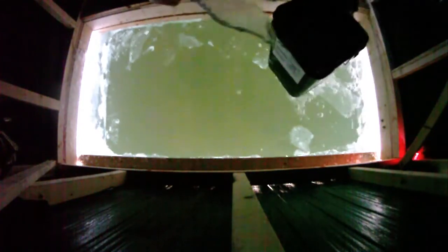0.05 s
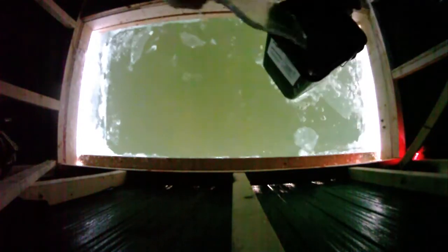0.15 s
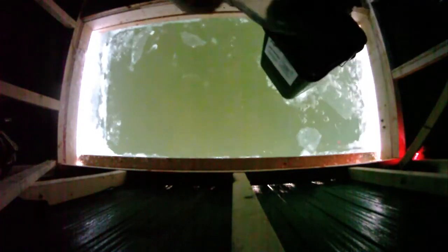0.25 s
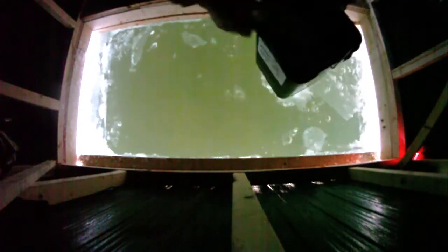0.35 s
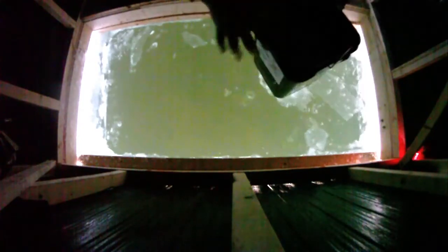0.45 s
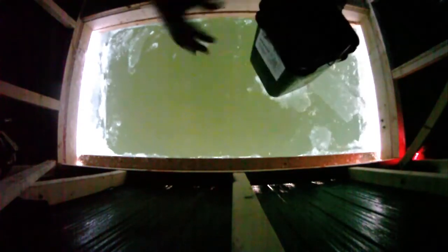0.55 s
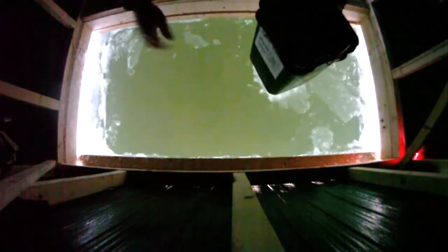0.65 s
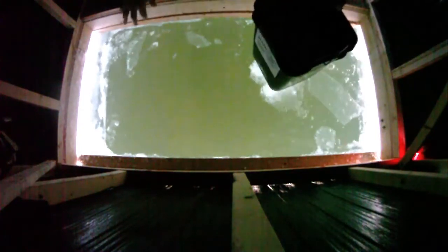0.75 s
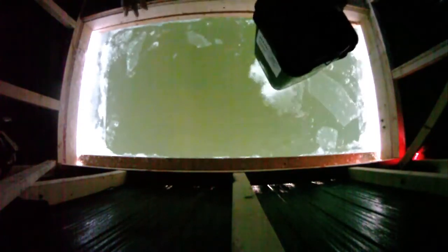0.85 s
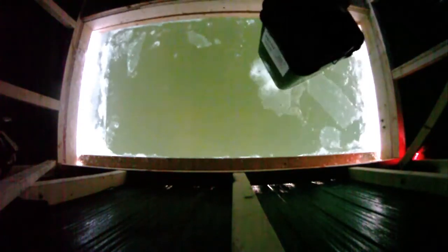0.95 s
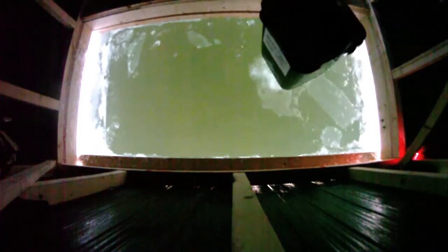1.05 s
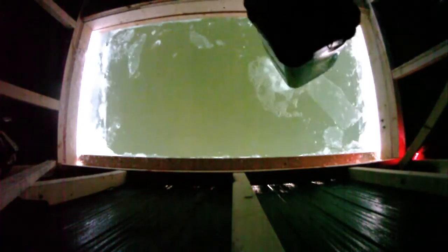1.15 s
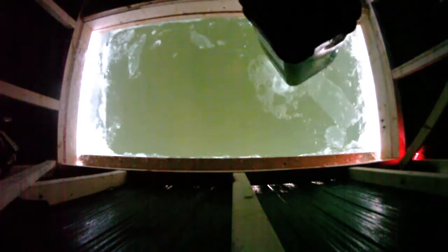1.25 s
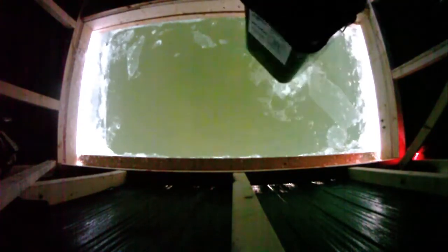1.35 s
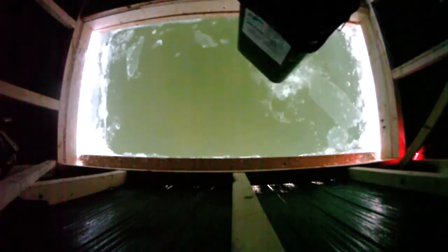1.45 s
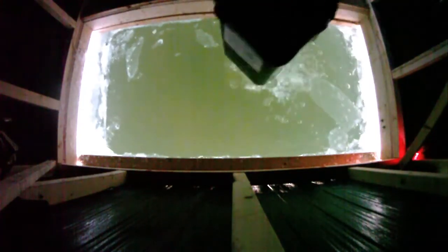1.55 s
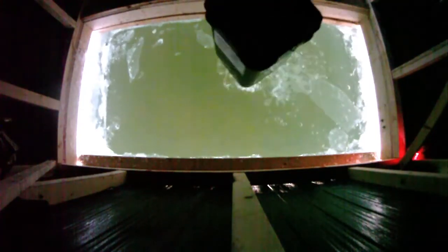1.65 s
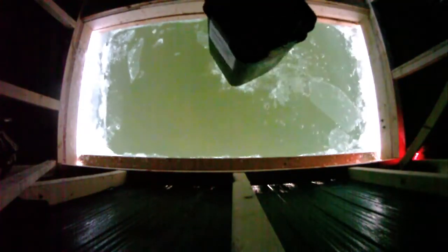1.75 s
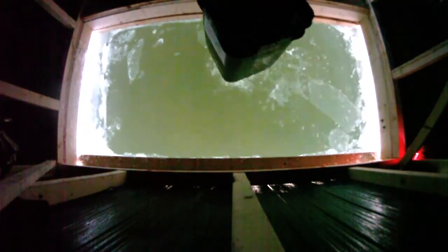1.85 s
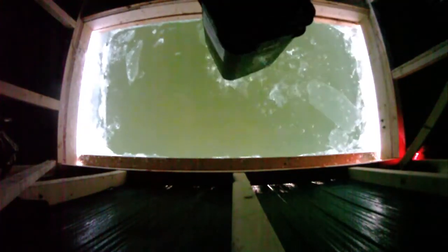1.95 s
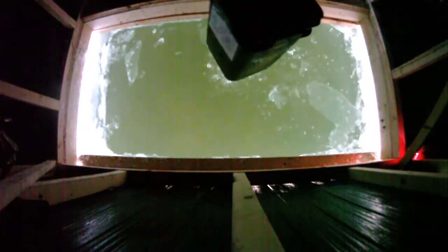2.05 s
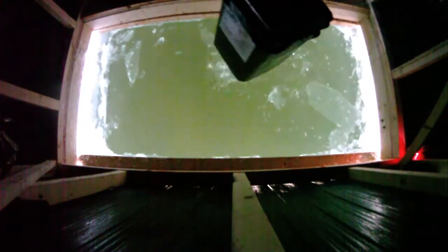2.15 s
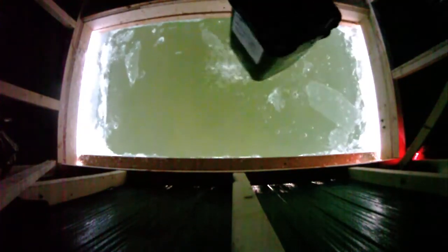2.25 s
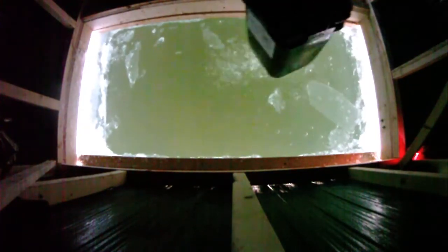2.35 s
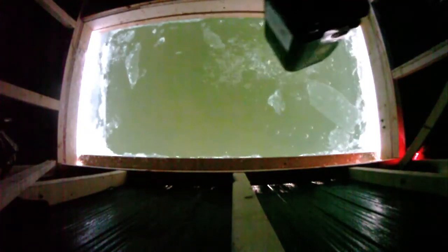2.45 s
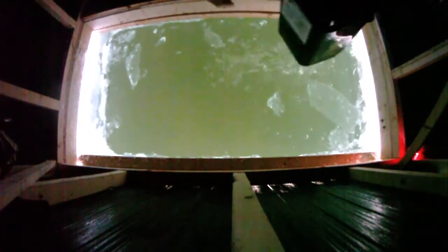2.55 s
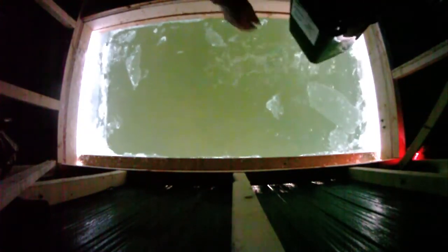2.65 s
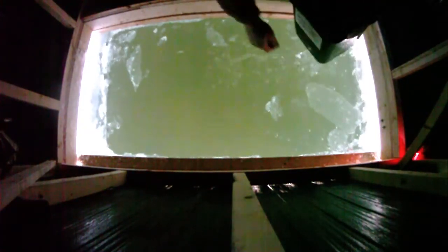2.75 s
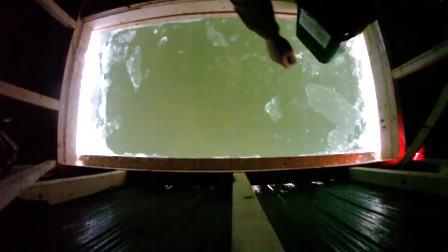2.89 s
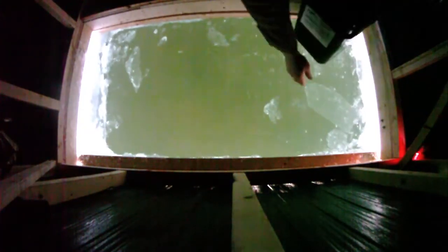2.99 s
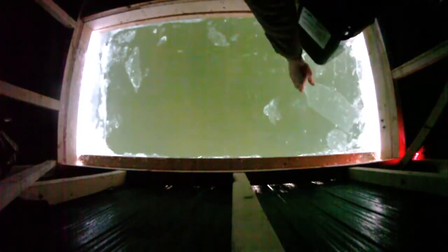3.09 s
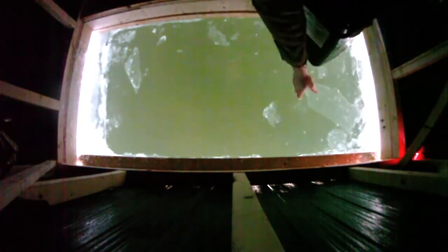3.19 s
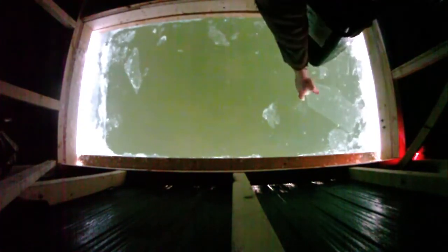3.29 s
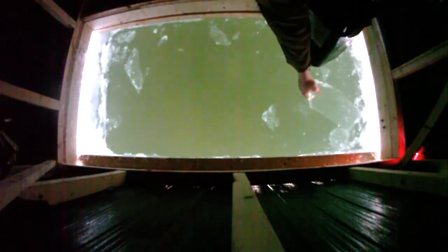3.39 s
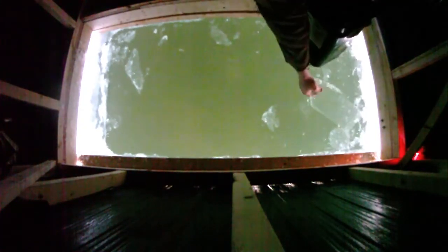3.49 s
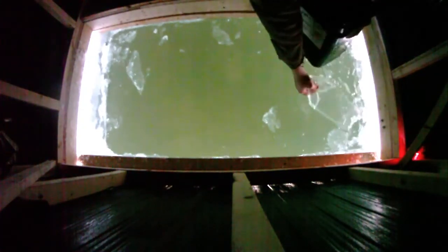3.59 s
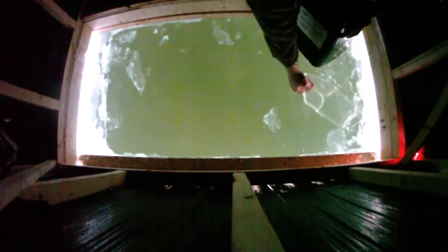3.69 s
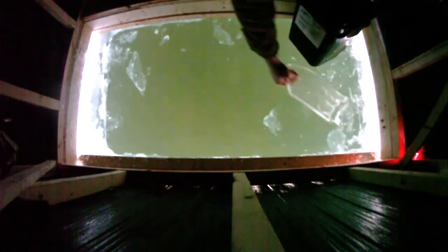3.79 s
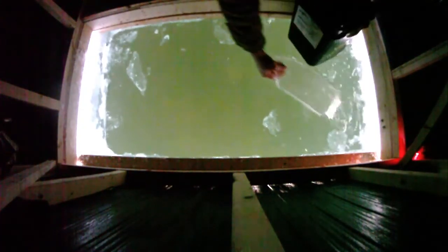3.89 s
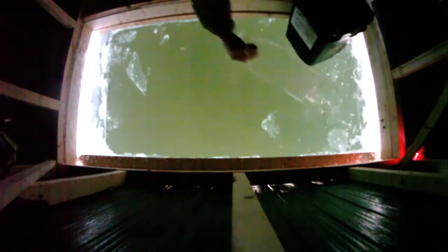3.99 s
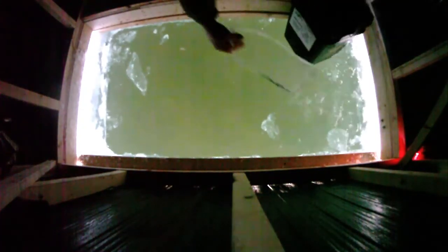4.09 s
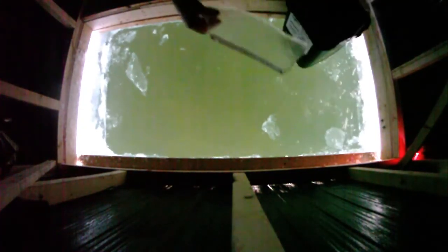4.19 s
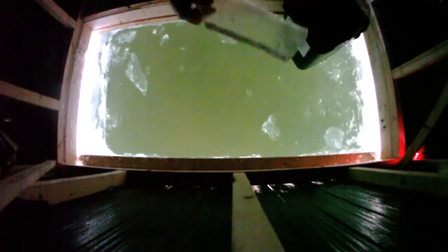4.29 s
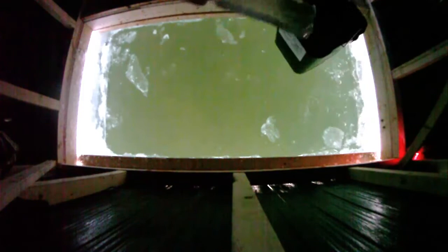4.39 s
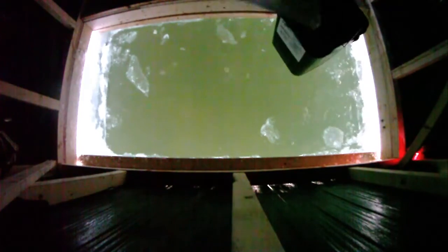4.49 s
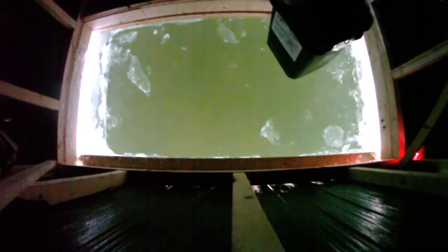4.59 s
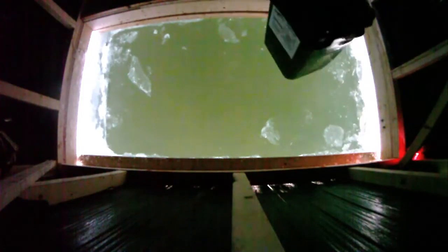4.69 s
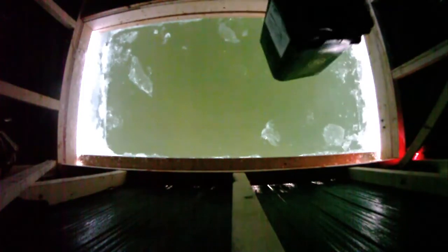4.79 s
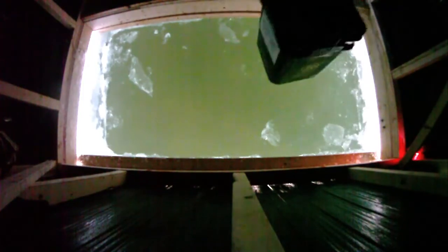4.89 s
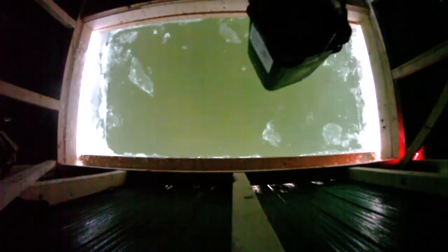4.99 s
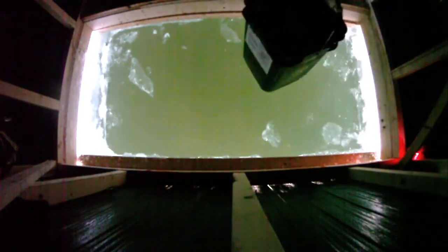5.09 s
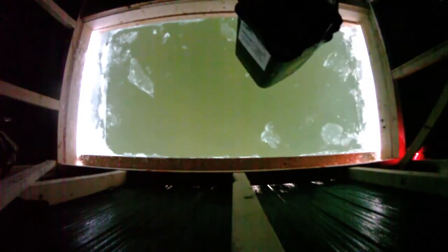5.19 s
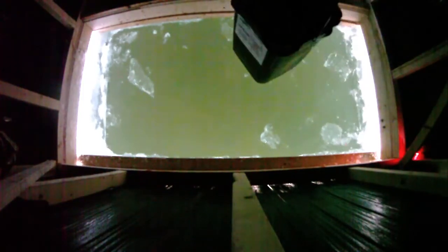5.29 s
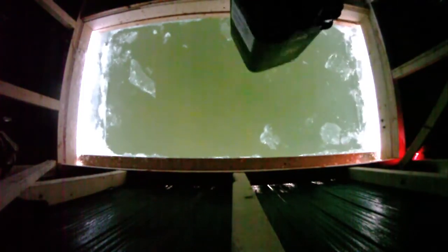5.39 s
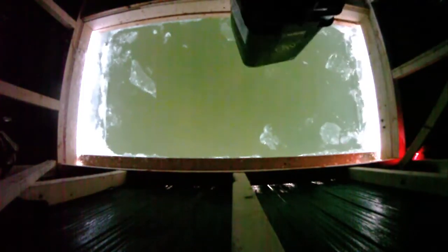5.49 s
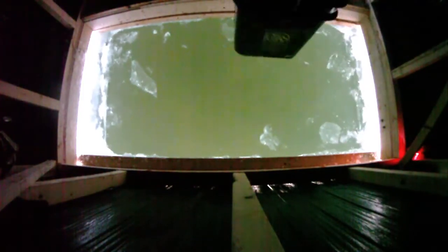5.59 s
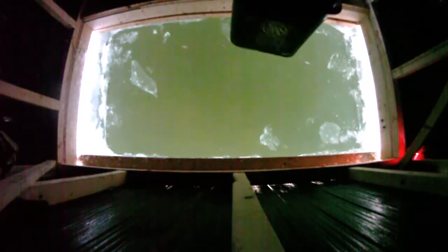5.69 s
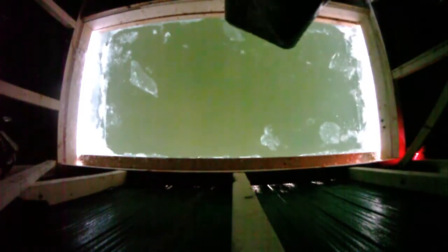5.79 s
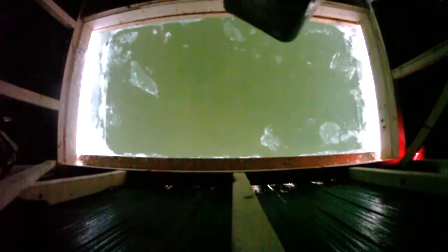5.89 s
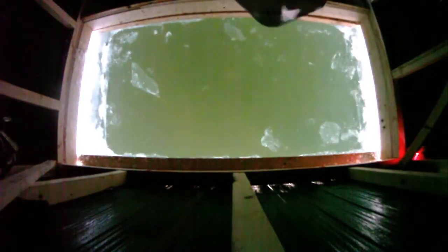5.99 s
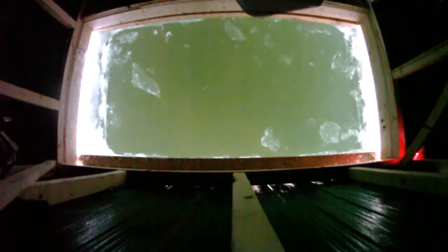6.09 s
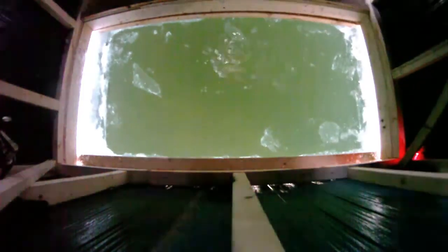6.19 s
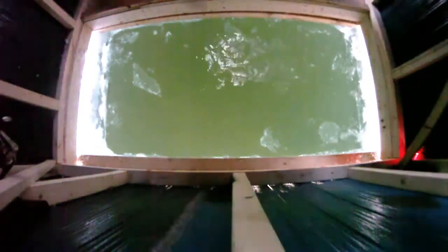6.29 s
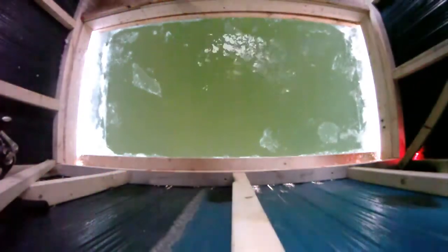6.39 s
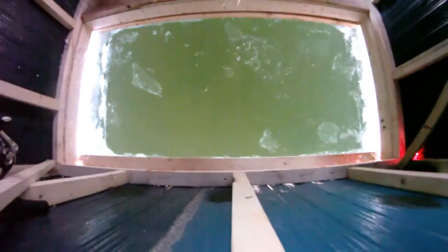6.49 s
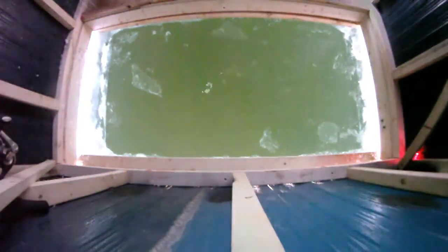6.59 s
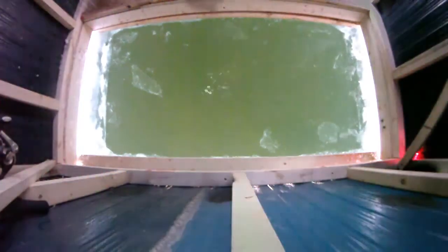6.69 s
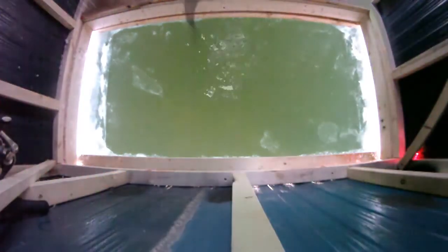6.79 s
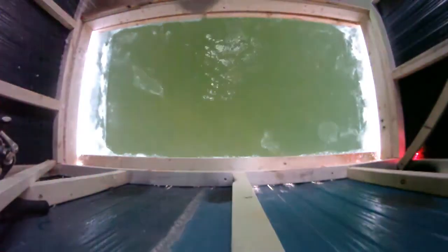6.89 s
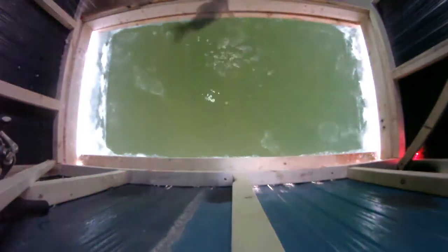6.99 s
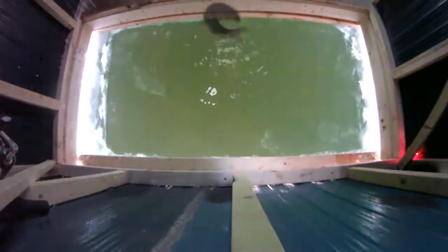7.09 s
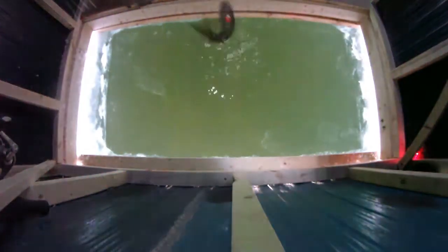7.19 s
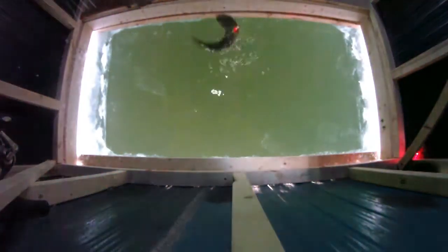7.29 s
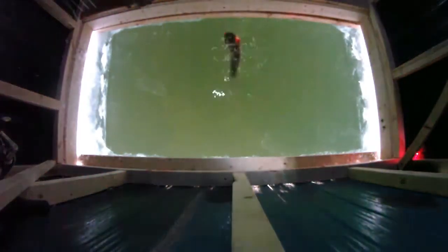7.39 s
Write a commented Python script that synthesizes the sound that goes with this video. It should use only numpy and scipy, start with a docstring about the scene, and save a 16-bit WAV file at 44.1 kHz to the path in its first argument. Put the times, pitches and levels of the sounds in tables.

```python
"""Slabs of ice crash and crumble into a plastic bucket held over a water hole in a small wooden shelter.
Tumbling ice and single blows excite the wall modes of the bucket; cracks are short noise bursts.
Water sloshes and sprays as grainy noise; drips and a few short creaks are damped tones, thuds damped sines.
Low noise buffets the microphone; the shelter answers with a decaying diffuse tail.
Towards the end a bright fluttering hiss sets in, and the sound drops out for a few instants."""
import sys
import numpy as np
from scipy import signal
from scipy.fft import rfft, irfft, next_fast_len
from scipy.io import wavfile
from scipy.ndimage import uniform_filter1d, map_coordinates

SR = 44100
rng = np.random.default_rng(int(sys.argv[2]) if len(sys.argv) > 2 else 0)


def bounce(signal):
    """Save signal as a 16-bit WAV file at the path given by the first command-line argument."""
    frames = np.transpose(np.atleast_2d(signal))
    limited = np.clip(frames, -1, 1)
    pcm = np.round(limited * 32767).astype(np.int16)
    wavfile.write(sys.argv[1], SR, pcm)


def voltage_ratio(level):
    """Linear amplitude factor for a level in decibels (scalar or array-like)."""
    return 10 ** (np.asarray(level, float) / 20)


N = 328545
TIME = np.arange(N) / SR

# nominal wall modes of the bucket, the third being the main one: (frequency [Hz], width [Hz], level [dB])
BUCKET_MODES = [(117, 11.1, -6.5), (193.3, 28.3, -6.5), (246.5, 37, -0.5), (319.3, 49.7, -2),
                (354.4, 26.6, -3), (525, 51, -8.5), (575.7, 22, -7.5), (688, 9.1, -15.5),
                (805, 13.5, -15.5), (1000, 22, -20.5), (1210, 540, -26.5)]
MAIN_MODE = 2
# blows on the bucket: (time [s], relative level [dB], crack over the blow [dB],
# pitch of the main mode [Hz], rattle of the shaken ice over the blow [dB])
BLOWS = [(0.478, -11, -14, 272, -22), (0.579, -8, -5, 270, -12), (0.605, 0.5, -14, 325, -24),
         (0.784, -18, -10, 297, -3), (1.299, -14.5, -12, 260, -12.5), (1.368, -19, -14, 347, -8),
         (1.46, -19, -18, 350, -11), (1.53, -18, -17, 361, -5), (1.618, -19, -19, 225, -8.5),
         (1.868, -31, -5, 280, -21), (2.551, -15.5, -14, 294, -7.5), (2.613, -20, -27, 350, -14),
         (3.159, -20.5, -22, 331, -5), (3.191, -35, -5, 224, -9), (3.238, -14, -15, 244, -11),
         (3.439, -13.5, -16, 258, -10.5), (3.576, -26.5, -8.5, 262, -8.5), (4.585, -29.5, -9, 398, -29),
         (4.846, -7, -13, 289, -26), (4.881, -14, 2, 318, -25), (4.955, -9.5, -18, 361, -18),
         (5.106, -20, -18, 306, -19), (5.525, -29, -4, 370, -5), (5.556, -24.5, -11, 233, -10),
         (5.674, -13, -29, 222, -11.5), (5.696, -21, -12.5, 232, -14), (5.797, -23.5, -24, 217, -15),
         (6.096, -32, -25, 190, -17), (6.484, -20.5, -12, 204, -8.5), (6.747, -26, 9.5, 230, -11),
         (6.803, -16, 3, 207, -5), (6.829, -13, -5.5, 228, -13), (6.882, -14, 3, 233, -27),
         (6.903, -17, 2, 386, -23), (7.146, -3.5, -10.5, 249.6, -8.5), (7.158, -6.5, -4, 241, -9),
         (7.184, -10.5, -4, 257.5, -9)]
# how each sliding load drums the wall: (level over the slush [dB], pitch of the main mode [Hz])
LOAD_DRUMMING = [(0.5, 270), (0.5, 282), (-1.5, 268.5)]
# thuds in the floor: (time [s], level [dB], pitch [Hz], T60 [s], rattle of the shaken ice over the thud [dB])
FLOOR_BLOWS = [(0.58, -13, 135, 0.15, -24), (2.38, -10, 62, 0.13, -47), (5.677, -15.5, 76.6, 0.2, -40),
               (6.161, -9.5, 75.4, 0.22, -22.5), (6.227, -32, 40.4, 0.18, -4),
               (6.257, 1.5, 128.6, 0.19, -23.5)]


def unit(x):
    """Normalisation to an rms of 1."""
    return x / np.sqrt(np.mean(x ** 2) + 1e-20)


def along(points, hz):
    """Interpolation of (frequency [Hz], value) points on a logarithmic frequency axis."""
    f, v = np.transpose(points)
    return np.interp(np.log(hz + 1), np.log(f + 1), v)


def curves(rows):
    """Linear interpolation in time: one value per sample for each column after the time."""
    s, *columns = np.transpose(rows)
    return [np.interp(TIME, s, column) for column in columns]


def wobble(rate):
    """Band-limited random modulation: a smooth curve through rate random knots a second."""
    return map_coordinates(rng.standard_normal(int(N * rate / SR) + 4), [TIME * rate])


def filtered(x, response):
    """Linear filtering: the spectrum of x times a response given as a function of frequency."""
    size = next_fast_len(N + SR // 2)
    return irfft(rfft(x, size) * response(np.fft.rfftfreq(size, 1 / SR)), size)[:N]


def resonant(modes):
    """Modal superposition: causal (frequency [Hz], width [Hz], level [dB]) resonances of alternating sign."""
    def response(f):
        total = 0
        for k, (centre, width, db) in enumerate(modes):
            damping = 1j * f * width
            total = total + (-1) ** k * voltage_ratio(db) * damping / (centre * centre - f * f + damping)
        return total
    return response


def rush(spectrum, patchy_db, grain_db, grain_rate):
    """Turbulent noise of rms 1: random gain patches in time and frequency, roughened into grains."""
    grains = rng.standard_normal(N) * voltage_ratio(grain_db * wobble(grain_rate))
    cells = signal.stft(grains, nperseg=512)[2]
    field = uniform_filter1d(rng.standard_normal(cells.shape), size=6, axis=0)
    field = uniform_filter1d(field, size=8, axis=1)
    noise = signal.istft(cells * voltage_ratio(patchy_db * unit(field)), nperseg=512)[1][:N]
    return unit(filtered(noise, lambda hz: voltage_ratio(along(spectrum, hz))))


def rising_tones(start, db, hz, cycles, rise, longest_s):
    """Damped oscillation with a climbing pitch, as of a bubble that nears the surface."""
    t = np.arange(round(longest_s * SR)) / SR
    age = np.outer(hz / cycles, t)  # in decay constants
    phase = 2 * np.pi * cycles[:, None] * age * (1 + rise * age)
    tones = voltage_ratio(db)[:, None] * np.exp(-age) * np.sin(phase)
    at = np.round(start * SR).astype(int)[:, None] + np.arange(len(t))
    return np.bincount(at.ravel(), tones.ravel(), N + SR)[:N]


def burst(s, db, t60):
    """Exponential decay: power of a wash that swells quickly at s and dies away."""
    out, age = np.zeros(N + SR), TIME[:SR]
    swell = 1 - np.exp(-age / 0.0049)
    out[round(s * SR):][:SR] = (voltage_ratio(db - 60 * age / t60) * swell) ** 2
    return out[:N]


def activity():
    """Addition of incoherent powers: gains of slush, spray, loose ice and each load on the wall."""
    # water running off and lapping between the events:
    # (time [s], slush [dB], spray [dB], loose ice in the bucket [dB])
    trickle = [(0.0, -43, -44, -46.5), (0.46, -47.5, -45.5, -61), (1.0, -43.5, -43.5, -49),
               (1.3, -41.5, -47.5, -64), (1.75, -40.5, -38, -60), (2.05, -40, -43, -56),
               (2.3, -46, -43.5, -77), (2.57, -40.5, -44, -52), (2.78, -48, -44.5, -44),
               (2.92, -73, -46, -53), (3.13, -52, -45, -63), (3.4, -46.5, -51, -46), (3.7, -69, -72, -59.5),
               (4.5, -65.5, -59, -60.5), (5.4, -53.5, -50.5, -46.5), (5.65, -56, -56.5, -71),
               (5.93, -47.5, -58.5, -44), (6.15, -51, -54.5, -51), (6.45, -51.5, -51, -41),
               (6.62, -51, -55, -37.5), (6.85, -26, -38, -26.5), (7.1, -49, -54, -41.5),
               (7.45, -56, -55, -39.5)]
    # loads of ice and water sliding in the bucket, one table each:
    # (time [s], slush [dB], spray over the slush [dB])
    slides = [
        [(0.474, -35, 8), (0.482, -27, -0.5), (0.56, -27.5, -2), (0.585, -15.5, -3.5), (0.62, -19, -3.5),
         (0.66, -18, -3.5), (0.74, -23.5, -5), (0.83, -24, -5), (0.89, -35, -3.5), (0.97, -53.5, 6)],
        [(1.362, -41, -10), (1.375, -33, -20), (1.52, -31.5, -13), (1.6, -36.5, -23), (1.74, -58, 12),
         (1.87, -31.5, -10), (1.9, -32.5, -18), (1.97, -44, 4), (2.08, -59.5, 19.5)],
        [(4.58, -56, -8), (4.6, -36, -13), (4.69, -37, -15), (4.75, -26.5, -15.5), (4.8, -26, -17),
         (4.83, -24, -2.5), (4.87, -15.5, -5.5), (4.95, -21, -4.5), (5.04, -27, -10), (5.11, -20, -5),
         (5.17, -24, -10), (5.21, -34.5, -2), (5.3, -43.5, -3), (5.46, -57, -11)],
    ]
    # short splashes: (time [s], slush [dB], spray [dB], T60 [s])
    splashes = [(2.785, -47, -38, 0.3), (3.16, -36.5, -41, 0.47), (3.194, -27, -32.5, 0.13),
                (3.23, -31, -35, 0.26), (3.438, -28, -38.5, 0.21), (3.6, -41, -52, 0.24),
                (3.896, -50.5, -50, 0.76), (4.076, -46, -46, 0.26), (4.115, -52, -35.5, 0.16),
                (5.235, -55, -28, 0.077), (5.68, -30, -59, 0.29), (5.95, -42, -58, 0.49),
                (5.986, -31.5, -38, 0.24), (6.165, -45, -65, 0.31), (6.226, -46, -62, .5),
                (6.485, -29, -53, 0.16)]
    rattle_t60_s = 0.24
    slush, spray, loose = voltage_ratio(curves(trickle)) ** 2  # powers
    loads = []
    for rows, (drum_db, _) in zip(slides, LOAD_DRUMMING):
        level_db, spray_db = curves(rows)
        gain = voltage_ratio(level_db) * (TIME > rows[0][0]) * (TIME < rows[-1][0])
        slush = slush + gain ** 2
        spray = spray + (gain * voltage_ratio(spray_db)) ** 2
        loads.append(gain * voltage_ratio(drum_db))
    for s, slush_db, spray_db, t60 in splashes:
        slush = slush + burst(s, slush_db, t60)
        spray = spray + burst(s, spray_db, t60)
    for s, db, *_, rattle_db in BLOWS + FLOOR_BLOWS:
        loose = loose + burst(s, db + rattle_db, rattle_t60_s)
    return *np.sqrt([slush, spray, loose]), loads


def tumbling_ice(loose_gain, loads):
    """Random excitation of a damped shell: tumbling ice drums the modes of the bucket wall."""
    tumble = rng.standard_normal(N) * voltage_ratio(1.5 * wobble(120))
    # wet ice damps the wall and lands softly: little reaches the wall above its modes
    damped = resonant([(hz, 2.1 * width, db) for hz, width, db in BUCKET_MODES])

    def wall(main_hz):
        """Retuning by load: all modes scale with the main one."""
        scale = BUCKET_MODES[MAIN_MODE][0] / main_hz
        return unit(filtered(tumble, lambda hz: damped(hz * scale) / (1 + 1j * hz / 900)))

    boom = loose_gain * wall(255.6)
    for gain, (_, main_hz) in zip(loads, LOAD_DRUMMING):
        boom = boom + gain * wall(main_hz)
    return boom


def bucket_knocks():
    """Impulsive excitation of modes: single blows ring the bucket and add a broadband crack."""
    crack_t60_s = 0.088
    rings, cracks, t = np.zeros(N + SR), np.zeros(N + SR), np.arange(SR // 5) / SR
    mode_hz, width, mode_db = np.transpose(BUCKET_MODES)[:, :, None]
    is_main = mode_hz == mode_hz[MAIN_MODE]
    decay = np.exp(-np.pi * width * np.where(is_main, 0.55, 1.2) * t)
    onset = 1 - np.exp(-t / 0.0042)
    for s, db, crack_db, main_hz, _ in BLOWS:
        # load and grip retune all modes together; the main mode leads, all vary from blow to blow
        tuned = mode_hz * main_hz / mode_hz[MAIN_MODE]
        favour_db = rng.normal(0, 1.8, mode_hz.shape) + 7 * is_main
        tones = np.sin(2 * np.pi * (tuned * t + rng.random(mode_hz.shape)))
        modes = voltage_ratio(mode_db + favour_db) * decay * tones
        crack = voltage_ratio(db + crack_db - 60 * t / crack_t60_s) * rng.standard_normal(len(t))
        at = round(s * SR)
        rings[at:][:len(t)] += voltage_ratio(db - 11) * modes.sum(axis=0) * onset
        cracks[at:][:len(t)] += crack
    return rings[:N] + filtered(cracks[:N], resonant([(1570, 1370, 0.0039)]))


def flowing_water(slush_gain, spray_gain):
    """Turbulence and bubble noise: slush churns with small bubbles bursting in it, spray fizzes."""
    # noise spectra: (frequency [Hz], relative level [dB])
    slush_spectrum = [(210, -54), (350, -6), (447, -8.5), (682, -3), (852, -7.5), (1110, -7.5),
                      (1660, -9.5), (5000, -23.5), (6500, -62), (11000, -120)]
    spray_spectrum = [(1470, -8), (2500, -3), (3870, -5), (5280, -4.5), (8060, -8.5), (8820, -12.5),
                      (11900, -13.5), (15200, -17.5)]
    surge = voltage_ratio(0.8 * wobble(25))
    slush = rush(slush_spectrum, patchy_db=2.2, grain_db=1.6, grain_rate=250)
    when, pitch, size = rng.random((3, 900))
    gurgle = rising_tones(when * N / SR, -2.2 * np.log(size), 550 * 6 ** pitch, 5 + 12 * size,
                          rise=0.04, longest_s=0.05)
    churn = slush_gain * surge * unit(slush + 0.5 * unit(gurgle))
    spray = rush(spray_spectrum, patchy_db=1.6, grain_db=1.6, grain_rate=400)
    return churn + spray_gain * surge * spray


def drops_and_creaks():
    """Damped oscillation: drops and small splashes plop, and a few short creaks sound (2.49 s, 3.82 s)."""
    # (time [s], relative level [dB], starting pitch [Hz], life before a small extension [cycles])
    short_tones = [(0.479, -11, 2160, 8), (.516, -10, 2300, 4.1), (.581, -5, 3100, 1.1),
                   (.646, 9, 3240, 0.34), (.648, -8, 7800, 8.5), (1.569, -23.5, 3470, 6.9),
                   (1.839, -32, 656, 9.5), (1.939, -24.5, 555, 7.3), (1.998, -28.5, 1790, 6),
                   (2.06, -44, 690, 10), (2.115, -36, 564, 13), (2.226, -42, 560, 7.9),
                   (2.299, -26, 1000, 4.1), (2.359, -34, 2770, 12), (2.362, -27.5, 890, 4.3),
                   (2.416, -27, 2500, 8.4), (2.487, -31.5, 1050, 7.3), (2.49, -39, 740, 14),
                   (2.488, -33, 367, 14), (2.59, -28, 3870, 12), (2.783, -17, 1630, 4),
                   (2.789, -18, 2970, 2.5), (2.809, -22, 1290, 6.2), (2.898, -34.5, 1010, 4.3),
                   (2.958, -31, 2200, 5.3), (3.037, -29, 1650, 7.7), (3.037, -18, 9000, 1.1),
                   (3.617, -36, 900, 2.3), (3.63, -51, 3640, 5.3), (3.819, -46, 820, 12),
                   (3.896, -25.5, 5760, 1.8), (3.954, -33.5, 1440, 10.6), (4.076, -26, 5970, 1),
                   (4.115, -14, 2750, 1.7), (4.118, -18, 3770, 3.6), (4.229, -34, 7200, 3.7),
                   (4.839, 2, 2880, 2.6), (4.838, 12.5, 6300, 0.58), (5.449, -37, 3140, 8.3),
                   (5.614, -43, 1300, 10), (5.691, -13, 1120, 0.81), (5.842, -34.5, 650, 32),
                   (5.95, -35, 700, 3.5), (5.99, -21.5, 1025, 3.7), (5.993, -24, 1900, 3.6),
                   (5.998, -24, 2680, 4.5), (6.049, -48, 1050, 6.9), (6.486, -24, 1900, 2.3),
                   (6.511, -42, 2300, 13)]
    s, db, hz, cycles = np.transpose(short_tones)
    return rising_tones(s, db, hz, np.abs(cycles) + 0.16, rise=0.0264, longest_s=0.24)


def floor_thuds():
    """Damped harmonic motion: boards under a boot swell over some tens of ms and die away."""
    out, t = np.zeros(N + SR), np.arange(SR // 2) / SR
    swell = 1 - np.exp(-t / 0.033)
    for s, db, hz, t60, _ in FLOOR_BLOWS:
        thud = voltage_ratio(db - 60 * t / t60) * swell * np.sin(2 * np.pi * hz * t)
        out[round(s * SR):][:len(t)] += thud
    return out[:N]


def hiss():
    """Amplitude modulation of resonant noise: the treble flutters unevenly about ninety times a second."""
    # noise spectrum: (frequency [Hz], relative level [dB])
    hiss_spectrum = [(120, -31), (200, -16), (504, -6.5), (985, -6), (1320, -9.5), (1550, -7.5),
                     (3320, -16.5), (5410, -11.5), (13900, -5.5), (15200, -16)]
    # fixed resonances: (frequency [Hz], width [Hz], level [dB])
    peaks = [(990, 32, 4.5), (1490, 15, 9), (1900, 68, 9), (2200, 69, 10.5), (3090, 93, 6.5), (4240, 46, 5),
             (5550, 14, 17), (7360, 70, 2), (8100, 57, 5), (10070, 67, 2), (11100, 98, -7), (14700, 130, 6)]
    # (time [s], level [dB]), silent before the first time
    hiss_level = [(6.618, -31), (6.75, -25), (6.9, -29), (7.1, -26), (7.45, -25.5)]
    beat = 2 * np.pi * np.cumsum(92 + 14 * wobble(20)) / SR
    noise = rush(hiss_spectrum, patchy_db=-0.5, grain_db=0.4, grain_rate=1600)
    ringing = filtered(noise, lambda hz: 1 + np.abs(resonant(peaks)(hz)))
    treble = filtered(ringing, lambda hz: 1 / (1 + (6500 / (hz + 1)) ** 4))
    flutter = voltage_ratio(4 * np.sin(beat) - 1.2)
    level = voltage_ratio(curves(hiss_level)[0]) * (TIME > hiss_level[0][0])
    return level * unit(ringing + (flutter - 1) * treble)


def shelter(x):
    """Diffuse reverberation: decaying noise tails, drawn anew each quarter second so that the echoes vary."""
    # (frequency [Hz], T60 [s])
    reverberation = [(200, 0.12), (1500, 0.24), (8000, 0.086)]
    out, step = np.zeros(N + SR), SR // 4
    for at in range(0, N, step):
        hz, t, cells = signal.stft(rng.standard_normal(SR // 3), SR, nperseg=256)
        decay = voltage_ratio(-60 * t / along(reverberation, hz)[:, None])
        tail = signal.istft(cells * decay, SR, nperseg=256)[1]
        echo = signal.fftconvolve(x[at:at + step], tail / np.linalg.norm(tail))
        out[at + 100:][:len(echo)] += echo  # 100 samples of delay
    return out[:N]


def buffeting():
    """Turbulent pressure on the microphone: gusty low noise, and its slowest part by itself."""
    # (time [s], level [dB])
    gusts = [(0.0, -46), (0.5, -53), (0.58, -34), (0.66, -43), (1.2, -43), (1.39, -45), (2.03, -43),
             (2.28, -50), (2.38, -43.5), (2.74, -31), (3.05, -40), (4.06, -49), (4.5, -50), (4.86, -34),
             (5.0, -42), (5.23, -35), (5.55, -46), (5.69, -31.5), (6.08, -42.5), (6.18, -23.5), (6.45, -34),
             (6.68, -19.5), (7.24, -22), (7.45, -28)]
    # noise spectrum: (frequency [Hz], relative level [dB])
    rumble_spectrum = [(4.7, -33), (8.0, 2), (49, -3.5), (76, -7.5), (108, -11), (157, -21), (200, -16),
                       (260, -48), (440, -120)]
    rumble = rush(rumble_spectrum, patchy_db=0.1, grain_db=0.8, grain_rate=15)
    air = voltage_ratio(curves(gusts)[0] + 2.76 * wobble(8)) * rumble
    slow = filtered(air, lambda hz: 1 / (1 + (hz / 42) ** 4))
    return air, slow


def background_hush():
    """Stationary broadband noise: a faint hush at a steady level."""
    # noise spectrum: (frequency [Hz], relative level [dB])
    quiet_spectrum = [(59, -31), (100, 2), (636, -15), (4400, -13), (5780, -17), (6420, -17.5),
                      (12800, -18.5), (15200, -21)]
    return voltage_ratio(-58) * rush(quiet_spectrum, patchy_db=1.2, grain_db=0.8, grain_rate=100)


def dropouts():
    """Gating: a gain that dips briefly, with smoothed edges."""
    # (start [s], end [s], depth [dB])
    gaps = [(6.206, 6.225, -25), (6.568, 6.588, -25), (6.603, 6.617, -14), (6.710, 6.727, -19),
            (7.073, 7.091, -30), (7.436, 7.452, -32)]
    dip_db = sum(db * ((TIME > start) & (TIME < end)) for start, end, db in gaps)
    return uniform_filter1d(voltage_ratio(dip_db), size=60)


def scene():
    """Superposition of all sources; the dropouts spare only the slowest buffeting and the faint hush."""
    slush_gain, spray_gain, loose_gain, loads = activity()
    boom = tumbling_ice(loose_gain, loads)
    knocks = bucket_knocks()
    flow = flowing_water(slush_gain, spray_gain)
    short_tones = drops_and_creaks()
    near = flow + boom + voltage_ratio(-7.5) * short_tones + knocks + floor_thuds() + hiss()
    walls = shelter(voltage_ratio(-3) * short_tones + voltage_ratio(-6.5) * knocks + voltage_ratio(-13) * (flow + boom))
    air, slow = buffeting()
    interrupted = (near + walls + air - slow) * dropouts()
    return (interrupted + slow + background_hush())[None]


def band_limit(x):
    """A steep low-pass at the top of the band."""
    return signal.sosfilt(signal.butter(12, 15980, fs=SR, output="sos"), x)


def record(dry):
    """Transducer limits: the microphone's band limit and drifting offset, then soft saturation."""
    # resting offset, pushed about by slow air pressure: (time [s], offset before smoothing [full scale])
    resting_offset = [(0, .038), (5.83, .038), (5.92, .072), (6.33, .09), (6.36, -.09), (6.42, -.07),
                      (6.475, .21), (6.555, 0), (6.6, .072), (7.45, .072)]
    top_hz = 15450
    drift = uniform_filter1d(curves(resting_offset)[0], size=1000)
    band_limited = filtered(dry[0], lambda hz: 1 / (1 + (hz / top_hz) ** 60))[None]
    x = band_limited + drift
    soft = x / (1 + np.abs(x / 0.99) ** 8) ** (1 / 8)
    return band_limit(soft)


dry = scene()
out = record(dry)
bounce(out)
```